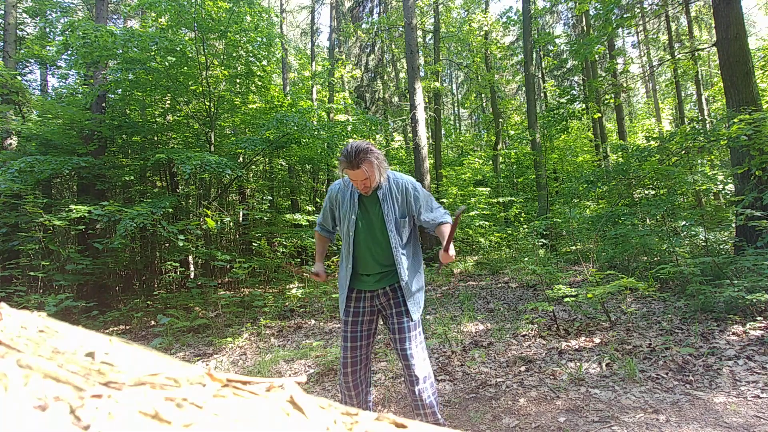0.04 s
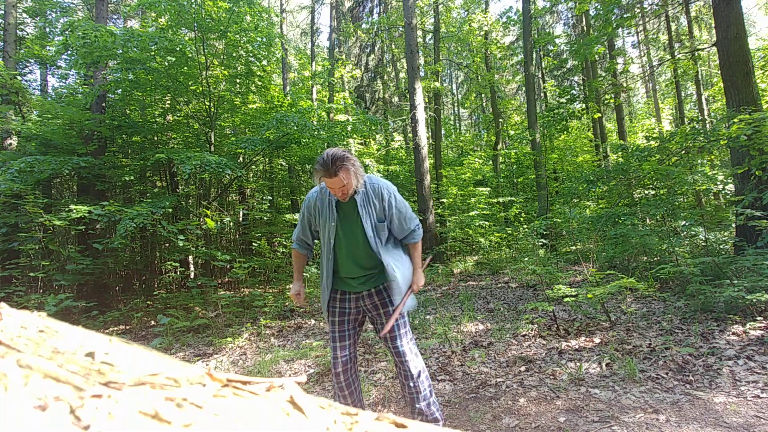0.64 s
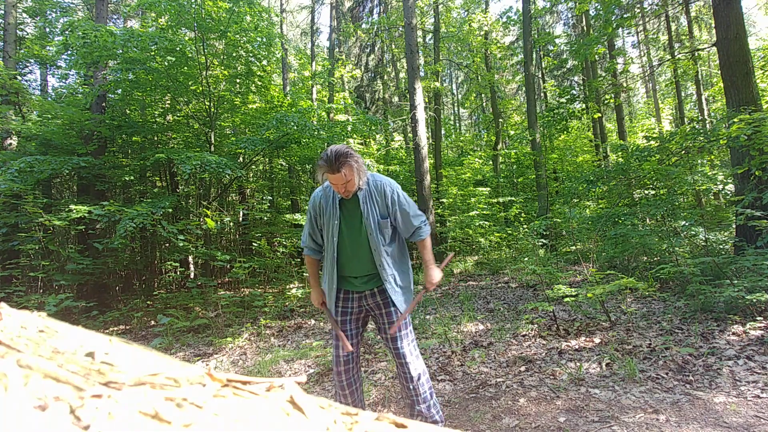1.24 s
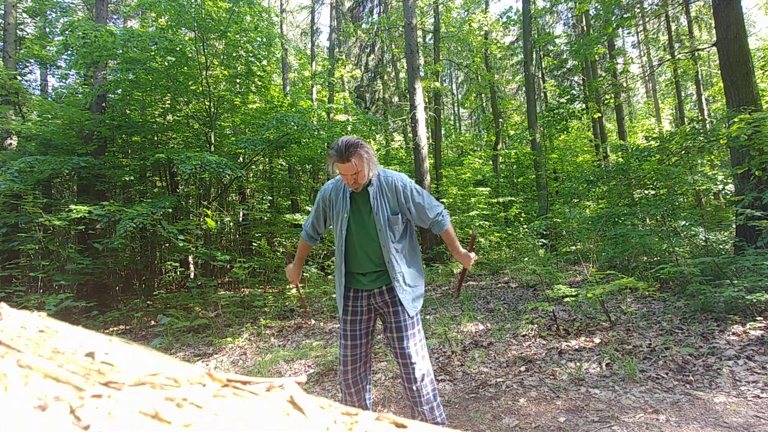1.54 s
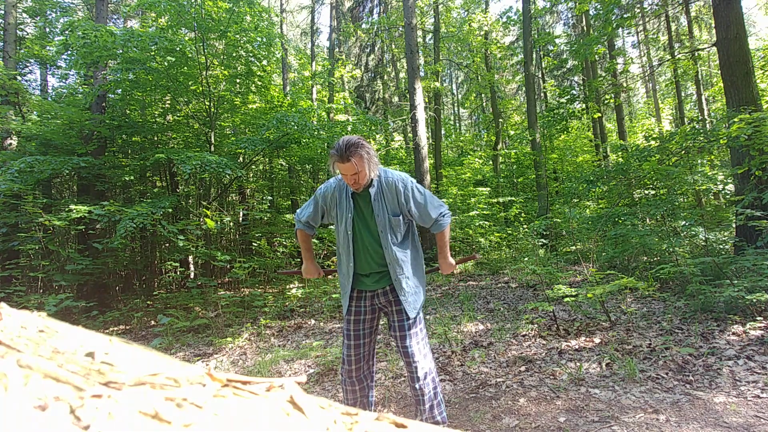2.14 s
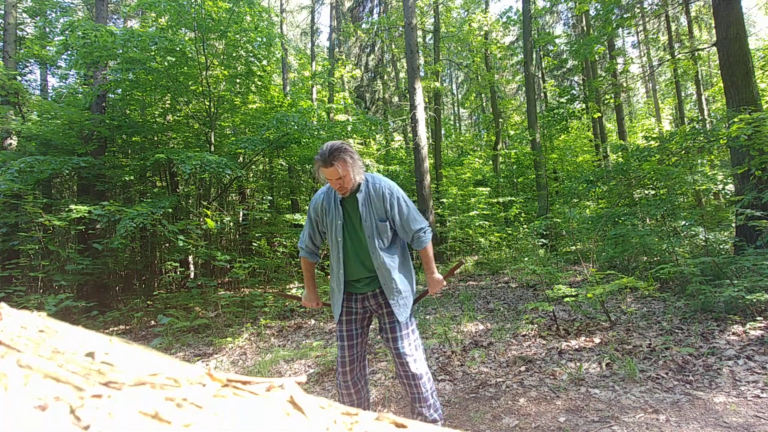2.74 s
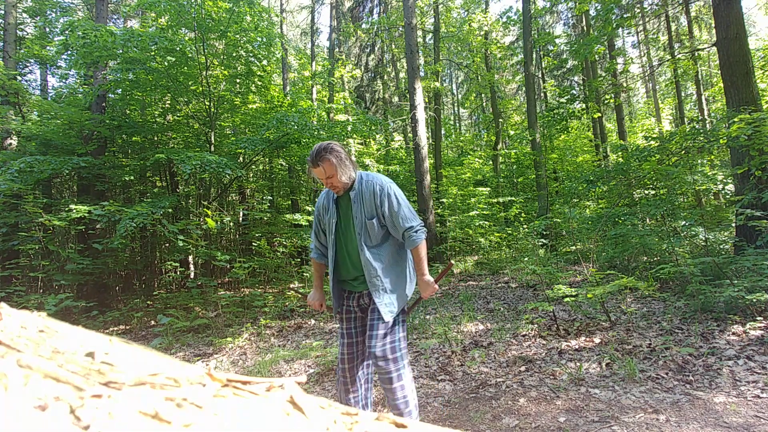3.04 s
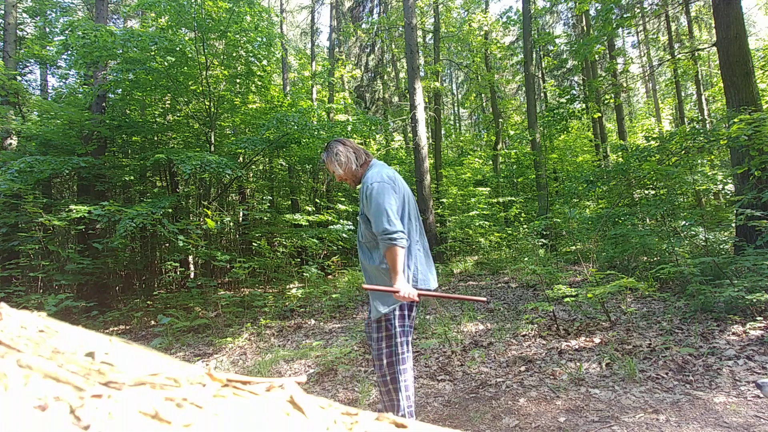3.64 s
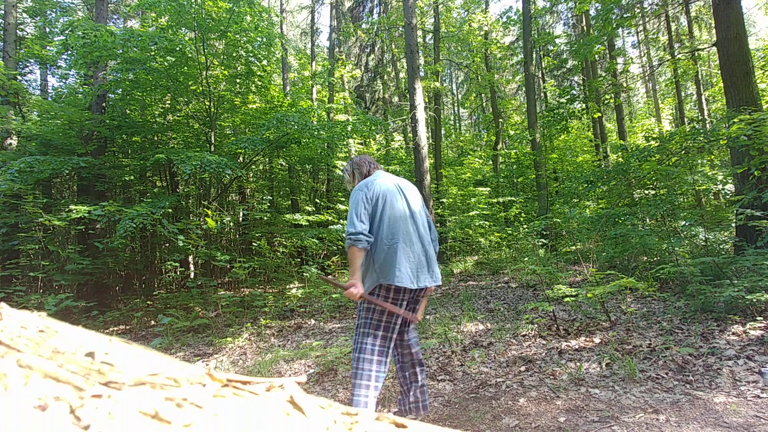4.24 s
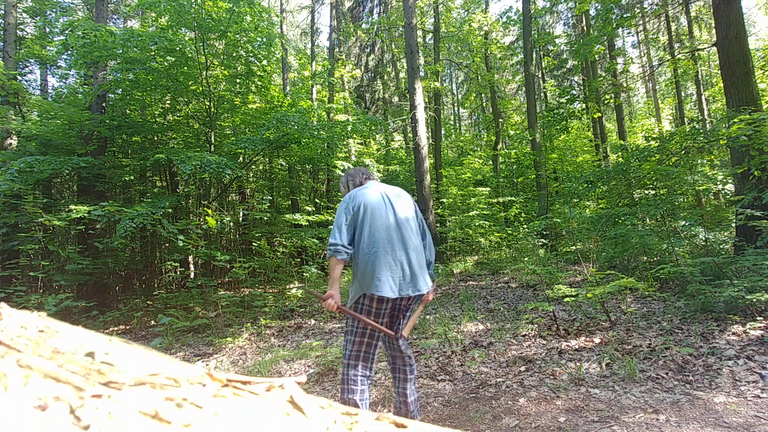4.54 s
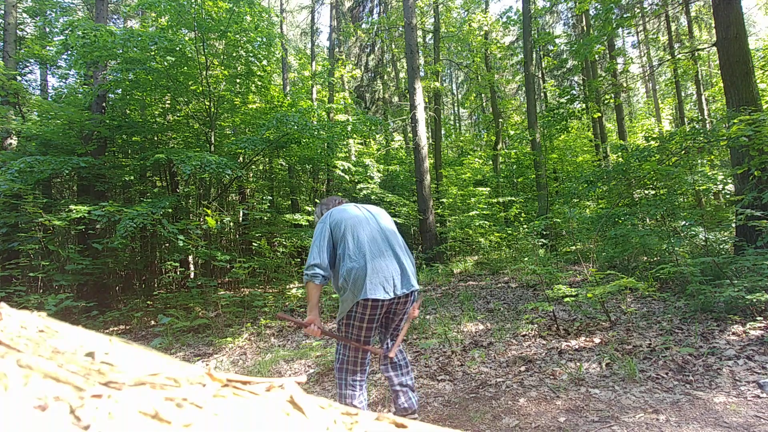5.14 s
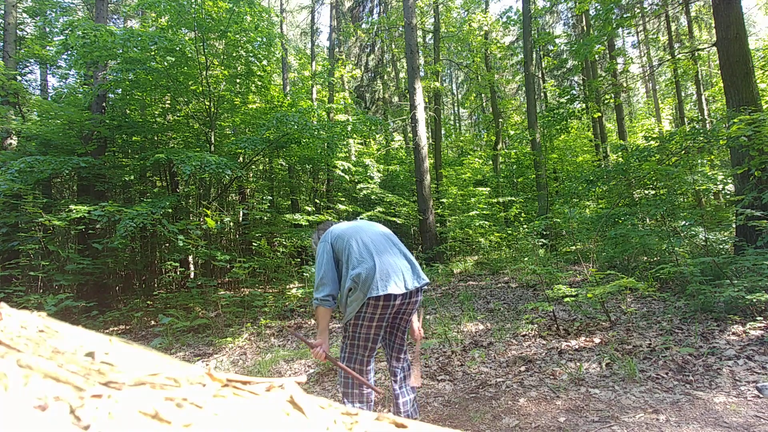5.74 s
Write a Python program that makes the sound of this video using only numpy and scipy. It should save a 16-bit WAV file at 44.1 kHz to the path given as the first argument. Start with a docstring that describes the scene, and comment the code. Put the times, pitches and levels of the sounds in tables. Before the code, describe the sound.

In a forest, a songbird close by whistles a gliding, warbling phrase and ends with two short calls. Throughout, sticks strike a person's clothed legs and body in an irregular patter of dry clicks, thumps and fabric snaps, some firm and some faint. Brief rustles of leaves and sleeves come from about halfway. Faint far chirps, a low rumble and a soft wash of air fill the background.

```python
"""Tapping sticks in a forest

A man swings two wooden sticks against his clothed legs and body: the wood rings, the body thuds and
the cloth snaps. His sleeves rub and he shuffles in dry leaves. A songbird whistles a phrase nearby,
small birds chirp farther off, and the trunks scatter the taps and calls into many small echoes.
A low distant rumble and a soft wash of air lie under it all."""
import sys
import numpy as np
from scipy import signal
from scipy.fft import rfft, irfft
from scipy.io import wavfile
from scipy.ndimage import uniform_filter1d

SR = 44100
rng = np.random.default_rng(int(sys.argv[2]) if len(sys.argv) > 2 else 0)


def store_pcm(level_fs):
    """Save levels as 16-bit WAV."""
    pcm = np.round(np.clip(level_fs, -1, 1) * 32767).astype(np.int16)
    wavfile.write(sys.argv[1], SR, np.atleast_2d(pcm).T)


N = 263718
TIME = np.arange(N) / SR

# Levels in the tables are relative: the functions set how loud each layer is in the mix.
# stick taps: (time [s], crack [dB], body thud [dB], wood knock [dB], cloth snap [dB], crack pitch [Hz])
TAPS = [(0.0227, -56, -69, -72, -85, 3650), (0.1037, -42, -42, -51.5, -55, 4040),
        (0.2848, -43, -48.5, -42, -55, 4160), (0.349, -70, -70, -77, -58.5, 3250),
        (0.4452, -48.5, -69, -59, -72, 3460), (0.6386, -45, -53, -61, -60.5, 2940),
        (0.8384, -51.5, -56, -62, -65, 3280), (1.2235, -51, -49, -50.5, -66, 3160),
        (1.8196, -62.5, -52, -78, -88, 3240), (1.9821, -54.5, -54.5, -58, -72.5, 3100),
        (2.1389, -47, -42.5, -84, -76, 3480), (2.2857, -51, -70, -55, -68, 3100),
        (2.4494, -59.5, -55, -74, -65, 3380), (2.615, -45, -46, -54, -64, 2370),
        (2.75, -56.5, -49.5, -70, -71, 4170), (2.9144, -59, -48.5, -61.5, -61.5, 3920),
        (3.22, -49.5, -48.5, -59.5, -50.5, 3640), (3.4288, -58.5, -45.5, -71, -63.5, 3300),
        (3.854, -56, -49, -57.5, -52.5, 4470), (3.986, -43, -44.5, -53, -46, 3660),
        (4.174, -57.5, -58, -64, -65, 5200), (4.2935, -53, -53, -57.5, -44, 4030),
        (4.4518, -58, -61, -75, -58, 3560), (4.598, -58, -63, -66, -57.5, 3240),
        (4.7532, -61, -49.5, -71, -57.5, 3320), (5.0657, -62, -51, -70, -67, 3280),
        (5.1578, -70, -46.5, -73, -61, 3220), (5.3955, -44, -45.5, -50.5, -52.5, 3720),
        (5.5367, -38.5, -38, -47, -44, 3690), (5.6969, -50.5, -63, -62, -60, 3220),
        (5.8337, -51.5, -46.5, -53.5, -57, 4900), (5.97, -53, -69, -63, -63, 3200)]
# tones of a hand-held stick: (pitch [Hz], level [dB], time to fade by 60 dB [s])
KNOCK_MODES = [(880, 3, 0.0023), (1547, -5.5, 0.019), (2260, -2, 0.0059)]
# its high tones: (pitch [times the crack pitch], level [dB], time to fade by 60 dB [s])
CRACK_MODES = [(.77, -5, 0.0033), (1, 0.5, 0.0064), (1.2, -5, 0.004), (1.42, -3.5, 0.002)]
# tones of the struck body: (pitch [Hz], level [dB], time to fade by 60 dB [s])
BODY_MODES = [(166, -3, 0.023), (346, 1.5, 0.013), (700, -5.5, 0.0065)]
# tone colour of snapping cloth and of rustling leaves: (frequency [Hz], level [dB])
SNAP_SPECTRUM = [(3000, -10.5), (5500, -3.5), (6700, -14), (7700, 5.5), (8400, 2), (9300, -13),
                 (10500, -19), (12000, -4.5), (16000, -14.5)]
RUSTLE_SPECTRUM = [(200, -10), (600, 1), (1500, -8), (2300, -4), (3500, 0), (5000, -5.5), (6500, -7.5),
                   (7900, 2), (9000, -6), (10300, -24), (12000, -10), (16000, -22.5)]
# scuffs of feet and sleeves: (peak time [s], rise [s], fall before shortening [s], level [dB])
SCUFFS = [(0.276, 0.011, 0.11, -62), (2.88, 0.053, 0.045, -72), (3.022, 0.021, 0.067, -53.5),
          (3.068, 0.016, 0.058, -51.5), (3.235, 0.032, 0.021, -61), (3.88, 0.024, 0.14, -67),
          (4.01, .015, 0.045, -62), (4.315, 0.021, 0.052, -55.5), (4.41, 0.055, .05, -69.5),
          (4.465, 0.0061, .035, -60), (4.87, 0.013, .04, -73), (5.08, 0.018, 0.023, -67.5),
          (5.178, 0.017, 0.027, -66)]

# the songbird's notes: (time [s], length [s], start pitch [Hz], middle pitch [Hz], end pitch [Hz],
# warble depth [Hz], warble rate [Hz], level [dB])
SONG_NOTES = [(0, 0.13, 1748, 1795, 1667, 0.5, 1, -61), (0.175, 0.083, 1800, 2150, 2166, 4, -4, -49),
              (.262, 0.064, 2110, 2149, 2188, -1, 7, -42.5),
              (0.406, 0.077, 3160, 3080, 2860, 4.5, -5, -47.5),
              (0.447, 0.1093, 2860, 2800, 2738, 114, 45.5, -40),
              (0.702, 0.057, 2885, 2515, 2830, 0, 7.5, -42), (0.749, 0.17, 2526, 2194, 2255, 0.5, -1, -41),
              (0.906, .066, 2490, 2538, 2583, 289, 36, -38),
              (0.964, 0.033, 2780, 2800, 2620, -8, -2, -36.5), (1.07, 0.065, 2196, 2267, 2524, 0, 0, -42),
              (1.115, .14, 2480, 2132, 1910, 1.5, 0, -42.5)]
# its closing call, a slide up and then a drop: the same columns, timed from the start of the call
HOOK_NOTES = [(0, 0.0668, 2150, 2603, 2623, 0, 0, -44.5), (.07, .036, 2047, 2076, 1830, 0.017, 0, -44.5)]
# that call comes twice, softer the second time: (time [s], level [dB])
HOOK_CALLS = [(1.35, -1), (1.574, -5.5)]
# far birds: (time [s], length [s], start pitch [Hz], end pitch [Hz], base rasp [Hz], level [dB])
CHIRPS = [(0.301, 0.027, 12400, 12370, 60, -69.5), (0.92, 0.42, 3656, 3234, 302, -64.5),
          (1.965, 0.041, 6200, 4860, 463, -66), (1.964, 0.18, 3460, 3680, 160, -65.5),
          (2.041, 0.16, 7780, 7530, 213, -70.5), (2.176, 0.053, 4000, 4140, 84, -77),
          (2.26, 0.048, 4270, 4890, 330, -65), (2.354, 0.037, 4400, 5000, 280, -71),
          (3.217, 0.12, 3540, 3680, 233, -71), (4.359, 0.099, 3470, 3790, 250, -64),
          (5.313, 0.132, 3496, 3880, 260, -63), (5.493, 0.34, 2335, 2340, 40, -78),
          (5.696, 0.28, 3320, 3310, 35, -75), (5.806, 0.06, 5600, 5380, 70, -62.5),
          (5.829, 0.1, 5230, 4770, 100, -55.5)]

# tone colour of the deep rumble, upper rumble, dull drone and air: (frequency [Hz], level [dB])
DEEP_SPECTRUM = [(20, -42), (30, -34), (39, -8.5), (48, 4), (56, -1), (64, -14), (90, -45)]
UPPER_SPECTRUM = [(45, -18), (58, -2.5), (66, 3.5), (76, -6), (95, -6.5), (115, -12.5), (145, -36),
                  (200, -46)]
DRONE_SPECTRUM = [(90, -25), (120, -0.5), (140, 0.5), (170, -8.5), (220, -24.5), (300, -34)]
AIR_SPECTRUM = [(100, -6.5), (165, 7.5), (235, 1.5), (330, -1), (450, -2), (700, -3.5), (1000, -6),
                (1400, -11.5), (2200, -18), (3500, -24), (6500, -30), (8000, -32), (10300, -37.5),
                (13000, -33.5), (16000, -31)]
# how the same four swell and sink: (time [s], level [dB])
DEEP_LEVEL = [(0.0, -41.5), (0.32, -40.5), (0.96, -39.5), (1.04, -31.5), (2.29, -36), (2.49, -26.5),
              (2.61, -43), (2.97, -33), (3.37, -41.5), (3.45, -29.5), (4.01, -32), (4.13, -49.5),
              (4.33, -36.5), (4.9, -44.5), (4.98, -43.5), (5.38, -37.5), (5.5, -36.5), (5.98, -38.5)]
UPPER_LEVEL = [(0.0, -41), (0.04, -28), (0.32, -23.5), (0.4, -29.5), (0.84, -27), (1.08, -31.5),
               (1.16, -23.5), (1.28, -33.5), (1.85, -28), (1.93, -34), (2.05, -32.5), (2.73, -33),
               (2.81, -29.5), (3.17, -36), (3.29, -31.5), (4.58, -29.5), (5.78, -24.5), (5.98, -33)]
DRONE_LEVEL = [(0.0, -45.5), (0.08, -35.5), (0.76, -43), (1.36, -34), (1.48, -44.5), (1.89, -39),
               (2.93, -46), (3.09, -39), (3.21, -51), (3.41, -35), (3.81, -45.5), (3.93, -39.5),
               (4.21, -48), (4.29, -43.5), (5.18, -45.5), (5.22, -41.5), (5.9, -43), (5.98, -43)]
AIR_LEVEL = [(0.0, -57.5), (2.06, -58), (2.71, -60), (3.01, -59), (5.98, -58.5)]
# how alike scattered sound is at the two ears: (frequency [Hz], likeness [-1 to 1])
EAR_LIKENESS = [(60, .995), (150, .98), (350, .85), (700, .3), (1400, -.05), (3000, .1), (8000, .2),
                (15000, 0)]
# how much louder the left side is: (frequency [Hz], left minus right [dB])
LEFT_LEAN = [(60, 4.5), (200, 3.8), (400, 5), (700, 5), (1300, 1.5), (2400, 0), (4400, -1), (8000, 3.5),
             (15000, 1.5)]


def sticks(crack_db=2.5, thud_db=10, knock_db=9, snap_db=8, graze_db=1.5, graze_s=0.0029):
    """Each tap grazes the cloth, thuds on the body and rings the stick; the cloth snaps and slides."""
    taps = np.zeros((2, N))
    t, lead = TIME[:SR // 10], TIME[:SR // 50]
    snap_fade = fade(t, t60=0.009) + from_db(-23) * fade(t, t60=0.035)  # a snap, then a soft slide
    graze_spectrum = [(150, -9), (400, 8.5), (1200, 3), (4000, -5), (9000, -40), (12000, -29)]
    graze_rise = np.exp((lead - lead[-1]) / graze_s)
    for s, crack, thud, knock, snap, crack_hz in TAPS:
        body = strike(BODY_MODES, detune=0.15, contact_s=0.004, chatter=0.64)
        wood = strike(KNOCK_MODES, detune=0.02, contact_s=0.004, chatter=0.98)
        high_wood = strike(CRACK_MODES, detune=0.02, contact_s=0.0012, chatter=0.84, pitch=crack_hz)
        add(taps, s, from_db(thud + thud_db) * body)
        add(taps, s, from_db(knock + knock_db) * wood)
        add(taps, s, from_db(crack + crack_db) * high_wood)
        add(taps, s, from_db(snap + snap_db) * snap_fade * stereo_noise(SNAP_SPECTRUM, len(t)))
        # the stick meets loose cloth just before the body
        graze = graze_rise * stereo_noise(graze_spectrum, len(lead))
        add(taps, s - lead[-1], from_db(knock + graze_db) * graze)
    ground_spectrum = [(100, 0), (600, 3), (2000, 0), (5000, -3), (9000, -2)]
    forest_spectrum = [(100, -3), (1000, 5), (4000, -3), (12000, -13)]
    ground = scatter(taps, t60=0.075, onset_s=0.003, spectrum=ground_spectrum)
    forest = scatter(taps, t60=0.23, onset_s=0.016, spectrum=forest_spectrum)
    return taps + from_db(-5.5) * ground + from_db(-25) * forest


def strike(modes, detune, contact_s, chatter, pitch=1):
    """One blow: rough wood chatters briefly and rings fading tones that vary with where it lands."""
    t, ring = TIME[:SR // 20], 0
    for k, (hz, level_db, t60) in enumerate(modes):
        hz = hz * pitch * (1 + detune * rng.standard_normal())
        gain = from_db(level_db + 2 * rng.standard_normal((2, 1))) * ear_gains(hz)
        ring = ring + (-1) ** k * gain * np.sin(2 * np.pi * hz * t) * fade(t, t60)
    force = rms_one(rng.standard_normal(len(t)) * np.exp(-t / contact_s)) / np.sqrt(len(t))
    blow = ring + chatter * signal.fftconvolve(ring, force[None], axes=-1)[:, :len(t)]
    return blow / np.sqrt(np.sum(blow ** 2) / (SR / 500))  # every blow gets the same energy


def scuffs(grain_db=2.5, crackle_db=-1, cracks_per_s=300, fall_speed=1.54):
    """Dry leaves and cloth rub in short swells, and brittle bits crack under the pressure."""
    swell = np.zeros(N)
    for s, rise, fall, db in SCUFFS:
        from_peak = (TIME - s) / np.where(TIME < s, rise, fall / fall_speed)
        swell += from_db(db) * np.exp(-from_peak ** 2)
    grains = from_db(grain_db * rng.standard_normal(N // 64 + 1))
    roughness = rms_one(np.repeat(grains, 64)[:N])
    clicks = (rng.random(N) < cracks_per_s / SR) * rng.standard_normal((2, N))
    cracks = rms_one(filtered(clicks, 2, [2200, 5500], "band"))
    pressure = swell / swell.max()
    rustle = roughness * stereo_noise(RUSTLE_SPECTRUM)
    return swell * (rustle + from_db(crackle_db) * pressure ** 2 * cracks)


def songbird(song_db=1, echo_db=-18.5, echo_s=0.049, leaves_db=-12, forest_db=-11, waver_hz=25):
    """Whistles from the right, with an echo off a trunk, scatter from leaves and a long forest tail."""
    song = np.zeros(N)
    hooks = [(call_s + s, *shape, db + call_db)
             for call_s, call_db in HOOK_CALLS for s, *shape, db in HOOK_NOTES]
    for s, *shape in SONG_NOTES + hooks:
        add(song, s, note(*shape, waver=waver_hz * flutter(span_s=0.0008, size=SR // 4)))
    direct = delay_left([song, song], lag_s=0.00012)
    echo = from_db(echo_db) * np.interp(TIME - echo_s, TIME, song)
    leaves = from_db(leaves_db) * scatter(song, t60=0.28, onset_s=0.0071)
    forest = from_db(forest_db) * scatter(song, t60=1.0, onset_s=0.035)
    return from_db(song_db) * (direct + echo + leaves + forest)


def note(length, start_hz, middle_hz, end_hz, warble_depth, warble_rate, db, waver,
         soft_db=-9, swell_s=0.011, attack_s=0.0044, release_s=0.007):
    """One whistled note: the pitch bends in an arc and may warble; the level swells, holds and stops."""
    t = TIME[:len(waver)]
    arc = np.polyfit([0, 0.5, 1], [start_hz, middle_hz, end_hz], 2)
    glide = np.polyval(arc, np.minimum(t / length, 1))
    warble = warble_depth * np.cos(2 * np.pi * warble_rate * t)
    gate = np.clip(np.minimum(t / attack_s, (length - t) / release_s + 0.5), 0, 1)
    swell = from_db(db + soft_db * np.exp(-t / swell_s))
    return whistle(glide - warble + waver, gate * swell)


def far_birds(direct_db=-2, rasp_scale=1.113):
    """Short chirps, made raspy by a shaky pitch and heard mostly by way of the trees."""
    calls = np.zeros(N)
    for s, length, start_hz, end_hz, rasp_hz, db in CHIRPS:
        t = TIME[:int(length * SR)]
        glide = np.linspace(start_hz, end_hz, len(t))
        rasp = rasp_scale * rasp_hz * flutter(span_s=0.0011, size=len(t))
        add(calls, s, whistle(glide + rasp, from_db(db) * np.sin(np.pi * t / length)))
    return from_db(direct_db) * calls + scatter(calls, t60=0.51, onset_s=0.0025)


def rumble(upper_db=-4, drone_db=-6.5):
    """A distant rumble: three bands of low noise swell and sink, reaching the left ear slightly late."""
    deep = gain_curve(DEEP_LEVEL) * steadied(stereo_noise(DEEP_SPECTRUM), span_s=0.071)
    upper = gain_curve(UPPER_LEVEL) * steadied(stereo_noise(UPPER_SPECTRUM), span_s=0.13)
    drone = gain_curve(DRONE_LEVEL) * stereo_noise(DRONE_SPECTRUM)
    bands = deep + from_db(upper_db) * upper + from_db(drone_db) * drone
    return delay_left(filtered(bands, 4, 300, "low"), lag_s=0.00057)


def air(air_db=4):
    """Air in the trees makes a soft, nearly even wash of noise."""
    return from_db(air_db) * gain_curve(AIR_LEVEL) * stereo_noise(AIR_SPECTRUM)


def scatter(x, t60, onset_s, spectrum=((1000, 0),)):
    """Countless small echoes build up and die away; by default no pitch is favoured."""
    t = TIME[:SR]
    echoes = stereo_noise(spectrum, SR) * fade(t, t60) * (1 - np.exp(-t / onset_s))
    echoes = rms_one(echoes) / np.sqrt(SR)
    return signal.fftconvolve(np.atleast_2d(x), echoes, axes=-1)[:, :N]


def stereo_noise(spectrum, size=N):
    """Noise with a given tone colour, alike at both ears only in the bass."""
    hz = np.arange(size // 2 + 1) * SR / size
    mid, side = rfft(rng.standard_normal((2, size)))
    alike = at_hz(EAR_LIKENESS, hz)
    pair = np.sqrt(1 + alike) * mid + np.sqrt(1 - alike) * side * [[1], [-1]]
    return rms_one(irfft(pair * from_db(at_hz(spectrum, hz)) * ear_gains(hz), size))


def whistle(hz, level):
    """A pure tone that follows a pitch and a level."""
    return np.sqrt(2) * level * np.sin(2 * np.pi * np.cumsum(hz) / SR)


def flutter(span_s, size):
    """A quick random wavering with a typical size of 1."""
    width = int(span_s * SR)
    return rms_one(uniform_filter1d(uniform_filter1d(rng.standard_normal(size), width), width))


def steadied(x, span_s):
    """Take the slow swells out of a noise."""
    power = uniform_filter1d(np.mean(x ** 2, axis=0), int(span_s * SR))
    return x / np.sqrt(power + 1e-12)


def soften(x, edge_hz=9200, leak_db=-19.5):
    """Let only a little of the highest treble through."""
    return filtered(x, 12, edge_hz, "low") + from_db(leak_db) * x


def filtered(x, order, hz, keep):
    """Keep the lows, the highs or a band; a higher order gives a sharper edge."""
    return signal.sosfilt(signal.butter(order, hz, keep, fs=SR, output="sos"), x)


def delay_left(x, lag_s):
    """Make the left channel arrive later."""
    return np.array([np.interp(TIME - lag_s, TIME, x[0]), x[1]])


def ear_gains(hz):
    """Left and right gains at a frequency."""
    return from_db(np.array([[0.5], [-0.5]]) * at_hz(LEFT_LEAN, hz))


def at_hz(points, hz):
    """Read between a table's frequencies, with every octave equally wide."""
    frequencies, values = np.transpose(points)
    return np.interp(np.log(np.maximum(hz, 1)), np.log(frequencies), values)


def gain_curve(points):
    """Turn (time, level) points into a gain for every sample."""
    return from_db(np.interp(TIME, *np.transpose(points)))


def fade(t, t60):
    """Die away by 60 dB every t60 seconds."""
    return from_db(-60 * t / t60)


def from_db(db):
    """Turn decibels into a gain to multiply by."""
    return 10 ** (np.asarray(db) / 20)


def rms_one(x):
    """Scale a signal to an average power of 1."""
    return x / np.sqrt(np.mean(x ** 2) + 1e-20)


def add(out, s, sound):
    """Mix a sound in, starting at s seconds."""
    i = max(0, round(s * SR))
    out[..., i:i + sound.shape[-1]] += sound[..., :max(0, N - i)]


def scene():
    """The man, the birds and the forest background together."""
    return soften(sticks() + scuffs()) + songbird() + far_birds() + rumble() + air()


def record(dry, low_hz=22, high_hz=15800):
    """Cut the deepest bass and the very top of the treble."""
    dry = filtered(dry, 2, low_hz, "high")
    return signal.sosfilt(signal.ellip(10, 0.1, 80, high_hz, fs=SR, output="sos"), dry)


dry = scene()
out = record(dry)
store_pcm(out)
```